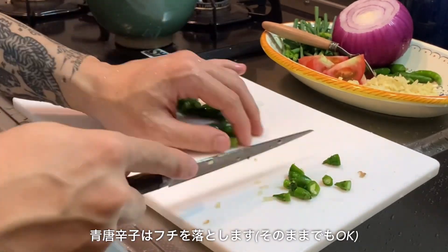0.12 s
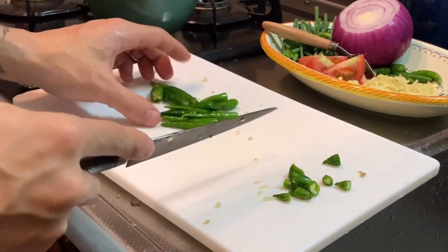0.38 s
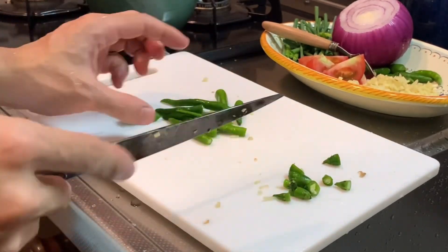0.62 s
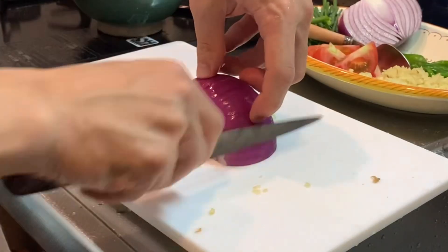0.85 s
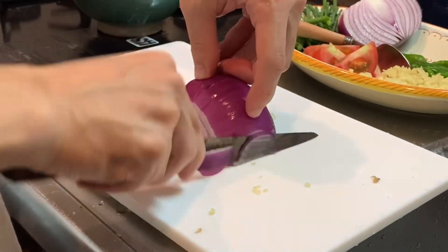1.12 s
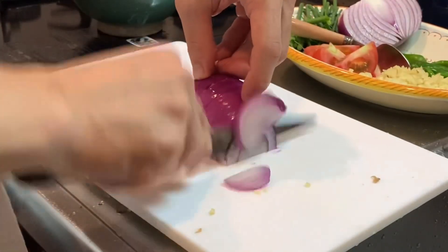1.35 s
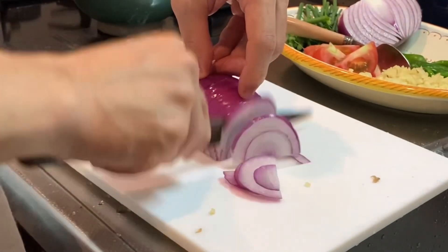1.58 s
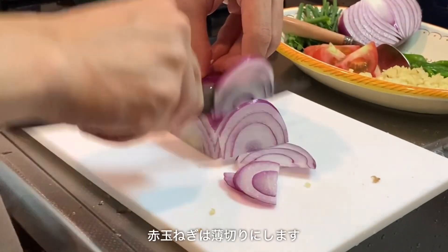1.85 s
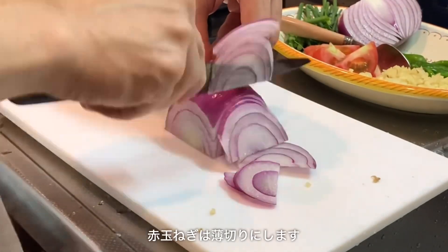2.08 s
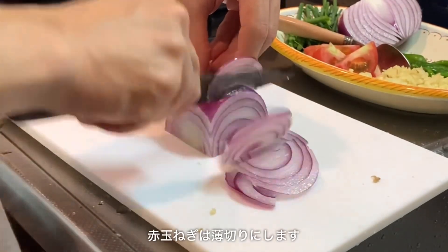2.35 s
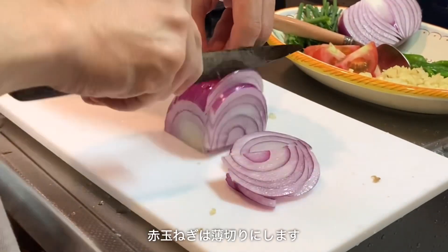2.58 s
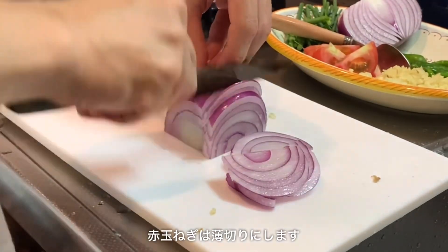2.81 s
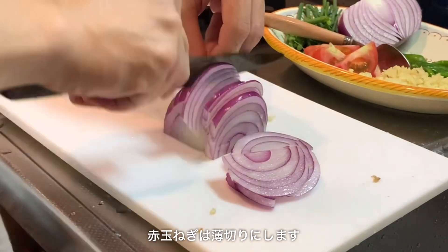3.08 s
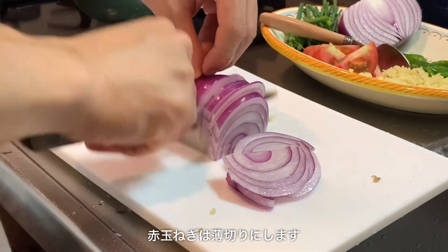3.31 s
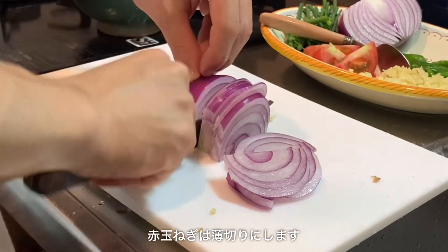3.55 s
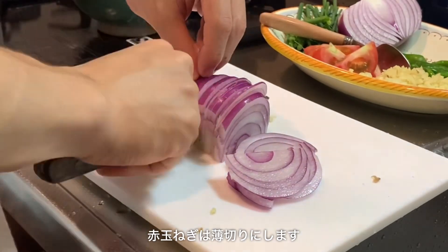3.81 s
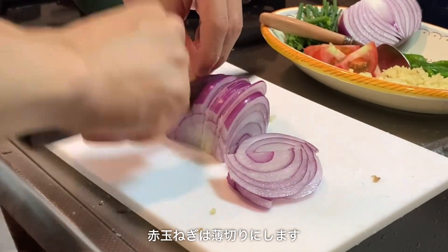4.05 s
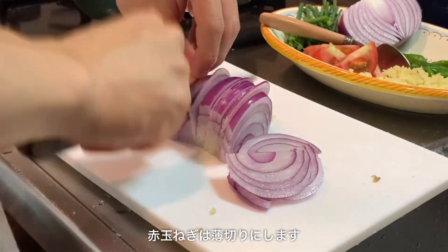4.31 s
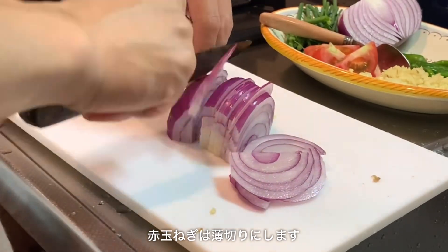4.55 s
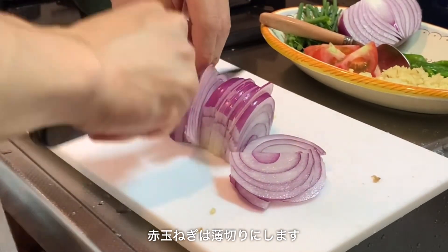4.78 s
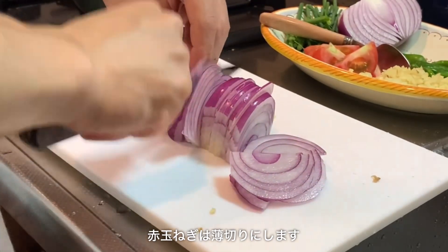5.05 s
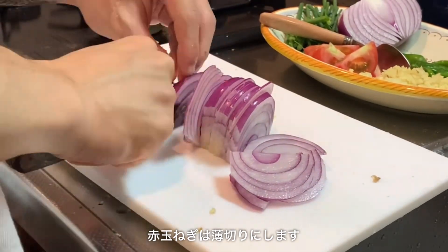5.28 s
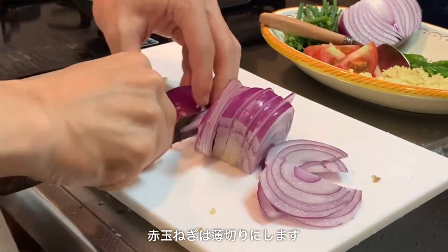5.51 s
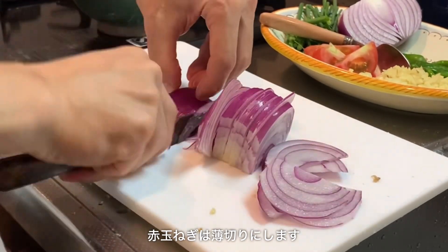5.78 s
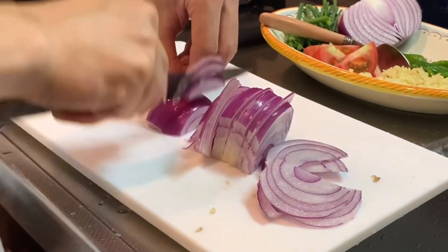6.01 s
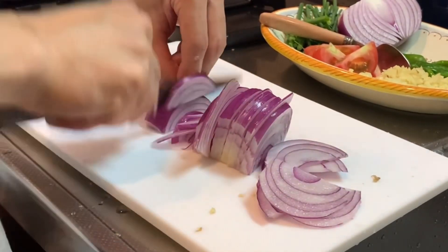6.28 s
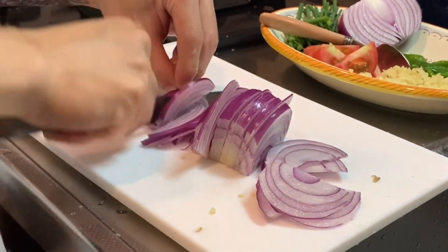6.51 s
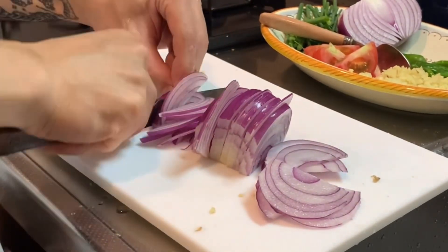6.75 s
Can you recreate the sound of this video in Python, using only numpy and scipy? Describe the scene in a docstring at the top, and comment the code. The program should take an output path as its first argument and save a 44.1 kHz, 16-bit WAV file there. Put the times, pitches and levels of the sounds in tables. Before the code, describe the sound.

A chef's knife slices an onion in rapid, crisp taps on a plastic cutting board, with wet crunches between, in a small kitchen with a fan behind.

```python
"""A chef's knife slices an onion on a plastic board in a small hard kitchen, close to a stereo microphone.
Each blow is a noise crack with a spike and a bounce, ringing board and blade modes, a room tail and a thud.
Grainy noise hisses through the wet flesh before each blow; fingers rustle in soft swells of dull noise.
Behind, a steady extractor fan of shaped noise and wavering sines is let through loud at first,
then held down by a noise suppressor, drawn as a level curve, that opens again during the later chopping."""
import sys
import numpy as np
from scipy import signal
from scipy.fft import rfft, irfft, next_fast_len
from scipy.io import wavfile
from scipy.ndimage import uniform_filter1d, map_coordinates

SR = 44100
rng = np.random.default_rng(int(sys.argv[2]) if len(sys.argv) > 2 else 0)


def decibels_to_gain(level_db):
    """Convert a level in decibels to a linear amplitude gain (20 dB per decade)."""
    exponent = np.asarray(level_db, float) / 20
    return 10 ** exponent


def log_audio(samples):
    """Write samples as a 16-bit WAV file to the path given in sys.argv[1]."""
    # one column per channel
    frames = np.atleast_2d(samples).T
    # limit to full scale, then quantise
    limited = np.clip(frames, -1, 1)
    pcm = np.round(limited * 32767).astype(np.int16)
    wavfile.write(sys.argv[1], SR, pcm)


N = 303408

# Blade on board: t/s, crack level/dB, then against the crack: knock level/dB, edge sparkle level/dB;
# last, time in the flesh before the blow/s
BLOWS = [(1.035, -32, -18, -58, 0.024), (1.1127, -27, -14.5, -29, 0.015), (1.2082, -28, -15.5, -35, 0.017),
         (1.2959, -18, -22.5, -19, 0.013), (1.3793, -20.5, -19.5, -24.5, 0.012),
         (1.4729, -17.5, -26, -19.5, 0.02), (1.573, -18.5, -24, -19.5, .023),
         (1.6741, -23, -23.5, -30, 0.027), (1.7836, -23, -21.5, -27, 0.031),
         (1.893, -17, -22, -14.5, 0.018), (2.0215, -22.5, -24.5, -18.5, 0.032),
         (2.1473, -25.5, -22, -29.5, 0.038), (2.2695, -20.5, -22, -12.5, 0.032),
         (2.5233, -23, -16, -17.5, 0.019), (2.6579, -26.5, -17, -20.5, 0.035),
         (2.7747, -20.5, -20, -17, .025), (2.9162, -32.5, -12.5, -19, 0.033),
         (3.0402, -25, -17.5, -19.5, 0.034), (3.1597, -24, -17, -22, 0.032),
         (3.3029, -33.5, -15, -21, 0.035), (3.4314, -30, -15, -19.5, 0.038),
         (3.5541, -22.5, -15, -18, 0.024), (3.8317, -35, -9.5, -27, 0.04),
         (3.959, -26.5, -16, -26.5, 0.037), (4.0886, -23, -20, -19.5, 0.032),
         (4.353, -24, -18.5, -21.5, 0.034), (4.4854, -18.5, -20.5, -21, 0.031),
         (4.7527, -26.5, -19, -23.5, 0.036), (4.8772, -22, -13.5, -21, 0.02), (5.014, -20, -17, -20, .023),
         (5.1396, -22, -18, -26.5, 0.0046), (5.6992, -28.5, -13.5, -23, 0.0025),
         (5.7971, -43, -8, -35, 0.0044), (5.879, -28, -14.5, -18, 0.0053), (5.972, -41, -7, -38, 0.012),
         (6.0606, -34, -11.5, -31, .0145), (6.1378, -30.5, -12, -20.5, 0.0067),
         (6.232, -27.5, -19, -27, 0.017), (6.3185, -36, -11, -45, 0.017), (6.406, -26.5, -17, -20, 0.0098),
         (6.505, -30, -15.5, -25, 0.015), (6.5949, -33, -13, -20.5, .014),
         (6.724, -28.5, -14.5, -21, 0.013)]
# Light touches of blade or food on the board: t/s, crack level/dB, then against the crack:
# knock level/dB, mid ring level/dB, sparkle level/dB
LIGHT_TOUCHES = [(0.381, -64, 2, -1, -18), (0.4538, -62.5, 10, 6, -10), (0.7887, -60.5, 9, 2, -1),
                 (4.5874, -52, 6.5, 1.5, -1), (5.2749, -62, 14.5, -4, -18), (5.389, -64.5, 0, 12.5, -38),
                 (5.5738, -49.5, -5, 3, -29)]
TOUCH_THUD_DB = -71.5
USUAL_CRACK_DB, USUAL_PACE = -25, 8  # pace in strokes a second
RING_DB, RING_GROWTH = -7.5, 0.54  # against a usual crack; dB of ring per dB of crack
THUD_DB, THUD_GROWTH, THUD_PER_PACE = -60.5, 0.34, 2  # relative dB; dB per dB of crack; dB per extra stroke/s


def place_on_board(s):
    """The blade works steadily across the board, from -1 at the start to 1 at the end."""
    return 2 * s * SR / N - 1


def blows():
    """Rows (s, crack, thud, knock, ring, sparkle dB, cut s): ring lags the crack, fast chopping thuds more."""
    s, crack_db, knock_db, sparkle_db, cut_s = np.transpose(BLOWS)
    gaps = np.diff(s, prepend=s[0] - 1 / USUAL_PACE)
    pace = uniform_filter1d(1 / gaps, size=5)  # over a few strokes
    firmness_db = crack_db - USUAL_CRACK_DB
    ring_db = RING_DB + (RING_GROWTH - 1) * firmness_db
    hurry = np.maximum(pace - USUAL_PACE, 0)
    thud_db = THUD_DB + THUD_GROWTH * firmness_db + THUD_PER_PACE * hurry - crack_db
    soft = [(at, level, TOUCH_THUD_DB - level, *rest, 0) for at, level, *rest in LIGHT_TOUCHES]
    return list(zip(s, crack_db, thud_db, knock_db, ring_db, sparkle_db, cut_s)) + soft


def edge_crack(t):
    """The edge lands as a noise burst with one sharp spike, then bounces a few milliseconds later."""
    crack = decibels_to_gain(-60 * t / .005) * (1 - np.exp(-t / .0002)) * rng.standard_normal((1, len(t)))
    crack[0, 6] += 2.5  # spike 6 samples after first contact
    bounce = decibels_to_gain(rng.uniform(-11.5, -2.0)) * np.roll(crack, round(rng.uniform(0.0017, 0.0038) * SR))
    return crack, bounce


USUAL_CUT_S = 0.032


def run_up(t, lead, cut_s):
    """Short noise that grows up to the blow, fainter after a very short cut."""
    strength = min(cut_s / USUAL_CUT_S + 0.31, 1)
    return strength * decibels_to_gain(-8.5 - 60 * t[lead::-1] / 0.023) * rng.standard_normal((2, lead + 1))


# Heavy counter, spectrum: f/Hz, relative level/dB per Hz
COUNTER_TONE = [(35, -53), (60, -6), (95, 2), (140, -1), (200, 2), (300, 3), (420, -30.5)]
COUNTER_HZ = 93.1  # centre; each blow strays from it


def counter_thud(t):
    """The heavy counter answers late and soft, as rumble and one low sine, fullest after 21 ms."""
    swell = t / 0.014 * np.exp(1 - t / 0.021)
    rumble = swell * unit(coloured(rng.standard_normal((2, len(t))), COUNTER_TONE))
    hz = COUNTER_HZ * decibels_to_gain(rng.normal(0, 1.0))
    return rumble, swell * np.sin(2 * np.pi * hz * t)[None]


# Board modes: f/Hz, level/dB, t60/s, drift/dB from mid board to the end of the work
BOARD_MODES = [(463.7, -13.5, 0.1615, 6), (503, -13, 0.14, 6), (673.8, -18.5, 0.16, -7.5),
               (946, -22.5, 0.11, 3.5), (1118, -24, 0.13, 9), (1559, -28, 0.21, 7), (1612, -14, 0.1, 5),
               (1735, -22, 0.11, 2), (1867, -22.5, 0.15, -2), (1920, -30, 0.12, 8), (1975, -19, 0.174, 6),
               (2040, -21.5, 0.13, 6), (2304, -29, 0.086, -8.5), (2190, -25, 0.12, 0),
               (2540, -44, 0.13, 5.5), (3380, -27, 0.024, -3), (3420, -30.5, 0.07, -11),
               (4020, -29.5, 0.12, 5), (4400, -33.5, 0.077, 10), (4360, -23.5, 0.12, 1.5),
               (4960, -29.5, 0.18, 1), (4750, -29, 0.17, -0.5), (5100, -29, 0.11, 6), (5280, -29, 0.14, 9),
               (5550, -29.5, .14, -1.5), (5830, -26.5, 0.11, 1.5), (6060, -23, 0.058, -10),
               (6950, -40, 0.066, 14)]
# Steel damped by hand and flesh, modes: f/Hz, level/dB, t60/s, drift/dB from mid board to the end of the work
BLADE_MODES = [(1263, -18, 0.032, -18.5), (1676, -15.5, 0.036, 0.5), (1854, -12.5, 0.049, 11),
               (2018, -14, 0.053, -1), (2380, -11.5, 0.029, -8), (2652, -11, 0.019, 1.5),
               (3310, -11.5, 0.023, 0), (4130, -11, 0.019, 5.5), (4608, -17, 0.037, -8.5),
               (4810, -18, 0.027, -12), (5050, -14.5, 0.02, 8.5), (5537, -6, 0.012, -3),
               (6720, -34, 0.017, 2), (6820, -21, 0.043, 7), (7340, -14, 0.017, -16.5),
               (8020, -19.5, 0.021, -22.5)]
# Where knock, ring, crack and sparkle sit: f/Hz
PART_HZ = [500, 2000, 5000, 11000]
# Crack and tail, spectrum: f/Hz, level/dB
CRACK_TONE = [(250, -48.5), (400, -32), (480, 12), (750, 2), (1200, 9.5), (2000, 8), (2900, -1), (3700, -2),
              (4900, 0), (6200, 4), (7300, -2.5), (9500, 8.5), (14500, 2.5), (16500, -22)]
# Crack and tail, change of tone: f/Hz, drift/dB from mid board to the end of the work
CRACK_DRIFT = [(500, 4), (1200, -1), (1900, 7.5), (2500, 1.5), (6000, 2.5), (7800, -1), (10000, 7)]
# What the walls give back of the treble: f/Hz, level/dB
WALL_TONE = [(5000, 0), (7500, -1.5), (11000, -6), (14500, -15), (15500, -21)]


def taps():
    """Each blow cracks and bounces, rings board and blade, fills the room and thuds into the counter."""
    near, far = np.zeros((1, N)), np.zeros((2, N))
    lead, count = SR // 100, SR * 2 // 5  # samples before and after contact
    t = np.arange(count) / SR
    mode_hz, mode_db, t60, drift_db = np.transpose(BOARD_MODES + BLADE_MODES)
    rise = 30 * t60 / mode_hz  # low, long modes build up late
    modes = np.exp(2j * np.pi * np.outer(mode_hz, t))
    modes = modes * decibels_to_gain(-60 * t / t60[:, None]) * (1 - np.exp(-t / rise[:, None]))

    for s, db, thud_db, knock_db, ring_db, sparkle_db, cut_s in blows():
        place = place_on_board(s)
        start = s - lead / SR
        colour = list(zip(PART_HZ, [knock_db, ring_db, 0, sparkle_db]))

        def shape(x):
            """Colour a sound as this blow, with room ahead for the filter's pre-ringing."""
            padded = np.pad(x, ((0, 0), (lead, 0)))
            return filtered(padded, lambda hz: decibels_to_gain(db + along(CRACK_TONE, hz)
                                                   + place * along(CRACK_DRIFT, hz) + along(colour, hz)))

        crack, bounce = edge_crack(t)
        add(near, shape(decibels_to_gain(3) * (crack + bounce)), start)
        add(far, shape(run_up(t, lead, cut_s))[:, lead:], start)
        bare_edge = filtered(crack, lambda hz: (hz > 8500) * (hz < 16700))  # gone at once
        add(near, decibels_to_gain(db + sparkle_db + 1.5) * bare_edge, s)

        scatter_db = rng.normal(0, 2.97, len(t60))
        strength = decibels_to_gain(db + mode_db + place * drift_db + along(colour, mode_hz) + scatter_db)
        phase = rng.normal(0, 40 * t60)  # short modes start in step with the blow, long ones do not
        add(near, decibels_to_gain(5.5) * (strength * np.exp(1j * phase) @ modes).imag[None], s)

        tail = reverberation(count, late_db=-19.5, late_slower=2.58, patchy_db=3.5)
        tail = (1 - np.exp(-t / 0.0017)) * tail
        add(far, shape(decibels_to_gain(-6) * coloured(tail, WALL_TONE)), start)

        rumble, hum = counter_thud(t)
        add(far, decibels_to_gain(db + thud_db - 3.5) * rumble, s)
        add(near, decibels_to_gain(db + thud_db - 8.0) * hum, s)
    return direct(near) + diffuse(far)


# Strokes and scrapes that never reach the board: t/s, length/s, relative hiss level/dB
FREE_STROKES = [(0.918, 0.025, -75), (2.362, 0.063, -64), (3.658, 0.049, -58.5), (4.189, 0.042, -58.5),
                (4.588, 0.042, -60), (5.335, 0.074, -72), (5.438, 0.036, -77)]
# Wet flesh, spectrum: f/Hz, relative level/dB per Hz
FLESH_TONE = [(290, -12.5), (500, -0.5), (1020, -11), (1950, -0.5), (2650, -1.5), (6010, -4), (10200, -10),
              (13200, -7.5), (15800, -12.5), (16500, -44)]
SINK_DB_PER_S, SCRAPE_DB_PER_S = 59.5, -60  # hiss grows towards a blow, fades in a free stroke
CUT_DB, CUT_DB_PER_S = -58.5, -190  # relative hiss level of a usual cut; quicker cuts hiss louder


def cuts():
    """Cells burst in a dense hiss that grows as the blade sinks; the room carries it on."""
    t, level_db = np.arange(N) / SR, np.full(N, -130.)
    strokes = [(*row, SCRAPE_DB_PER_S) for row in FREE_STROKES]
    for s, *_, length in BLOWS:
        strokes.append((s - length, length, CUT_DB + CUT_DB_PER_S * (length - USUAL_CUT_S), SINK_DB_PER_S))
    for s, length, db, slope in strokes:
        u = t - s
        fade_in_db = 3500 * np.maximum(.003 - u, 0)
        fade_out_db = 900 * np.maximum(u - length, 0)
        stroke_db = db + slope * (u - length / 2) - fade_in_db - fade_out_db
        level_db = np.maximum(level_db, stroke_db)
    grain = decibels_to_gain(3.7 * wobble(700) + 3.9 * wobble(90) + 1.97 * wobble(30))
    pops = 3.4 * (rng.random(N) < .02) * np.minimum(rng.exponential(size=N), 2)  # single cells pop louder
    hiss = coloured((grain + pops) * rng.standard_normal((2, N)), FLESH_TONE)
    close = decibels_to_gain(level_db + 4.0) * unit(hiss)
    tail = reverberation(SR // 2, late_db=-33.0, late_slower=1.8, patchy_db=4.0)
    tail = tail / np.linalg.norm(tail[0])
    return close + decibels_to_gain(-1.0) * signal.fftconvolve(close, tail, axes=1)[:, :N]


# Fingers push food over the board, soft swells: centre t/s, half width/s, level/dB
FINGER_SWELLS = [(.15, 0.054, -66.5), (.48, 0.037, -67.5), (.815, 0.021, -67.5), (5.41, .035, -73)]
# Scraping, spectrum: f/Hz, relative level/dB per Hz
FINGER_TONE = [(500, -4), (1200, 2), (3000, 0), (4800, -5), (6500, -17), (12000, -27)]


def rustles():
    """Fingers scrape food along in uneven, dull noise that swells and fades."""
    t = np.arange(N) / SR
    swells = sum(decibels_to_gain(db) * np.exp(-((t - s) / width) ** 2) for s, width, db in FINGER_SWELLS)
    grains = decibels_to_gain(1.9 * wobble(250) + 1.8 * wobble(45)) * rng.standard_normal((2, N))
    return swells * unit(coloured(grains, FINGER_TONE))


# Level of fan let through, before a random flutter: t/s, level/dB
FAN_LET_THROUGH = [(0, -54.5), (.3, -59), (.77, -58.5), (.83, -70), (1.4, -71), (1.9, -68), (5.05, -67.5),
                   (5.2, -72.5), (5.7, -71), (6, -61.5), (6.4, -63), (6.88, -72.5)]
# Air rush, spectrum: f/Hz, relative level/dB per Hz
AIR_TONE = [(25, -62.5), (50, -33), (90, -5.5), (160, -10), (300, -9), (430, -13.5), (540, -14), (700, -20),
            (1200, -21), (1700, -27.5), (2200, -36), (7000, -44.5), (10000, -45.5), (14300, -47),
            (15500, -70)]
# Motor and duct lines: f/Hz, pitch wander/Hz, relative level/dB
HUM_LINES = [(200.6, 1.3, -5.5), (271.7, .8, -1.9), (363, 3.5, -12), (547, 5.7, -14), (918, 28, -16),
             (1082, 9.2, -15.5), (1620, 28, -40.5), (4730, 99, -26.5), (8550, 180, -27.5)]


def fan():
    """Steady air rush as shaped noise, with wavering hum lines from motor and duct, let through by a level curve."""
    s, db = np.transpose(FAN_LET_THROUGH)
    air = unit(coloured(rng.standard_normal((2, N)), AIR_TONE))
    hum = np.zeros(N)
    for hz, wander, line_db in HUM_LINES:
        pitch = hz + wander * wobble(6 * wander)
        hum += decibels_to_gain(line_db + 1.34 * wobble(12)) * np.sin(2 * np.pi * np.cumsum(pitch) / SR)
    let_through = decibels_to_gain(np.interp(np.arange(N) / SR, s, db) + 2.3 * wobble(6.5))
    left, right = let_through * (decibels_to_gain(-3.0) * diffuse(air) + hum)
    return np.array([left, np.roll(right, 9)])  # the right port hears it 9 samples later


# Kitchen decay, main part: f/Hz, t60/s
ROOM_DECAY = [(100, 0.32), (500, 0.27), (1200, 0.12), (2000, 0.17), (5000, 0.16), (8000, 0.14),
              (13500, 0.12), (16000, 0.077)]


def reverberation(count, late_db, late_slower, patchy_db):
    """A fresh noise tail: each frequency dies at its own speed, a weaker part lingers, echoes come in patches."""
    hz, t, z = signal.stft(rng.standard_normal((2, count)), SR, nperseg=128)
    patches = uniform_filter1d(rng.standard_normal(z.shape[1:]), size=2, axis=0)
    patches = unit(uniform_filter1d(patches, size=8, axis=1))
    fall_db = -60 * t / along(ROOM_DECAY, hz)[:, None]
    gain = decibels_to_gain(patchy_db * patches) * (decibels_to_gain(fall_db) + decibels_to_gain(late_db + fall_db / late_slower))
    return signal.istft(z * gain, SR, nperseg=128)[1][:, :count]


# Left-right likeness of spread sound: f/Hz, correlation (1 = same)
LIKENESS = [(60, 1), (200, 0.91), (550, 0.75), (1650, 0.04), (5000, 0.021), (15000, 0)]


def diffuse(pair):
    """Two unrelated signals become left and right: alike in the bass, unrelated in the treble."""
    def mid_side(hz):
        turn = np.arccos(np.clip(along(LIKENESS, hz), -1, 1)) / 2
        return np.array([np.cos(turn), np.sin(turn)])
    mid, side = filtered(pair, mid_side)
    return np.array([mid + side, mid - side])


# Direct sound, phase by which left leads right: f/Hz, lead/rad
LEFT_LEAD = [(60, -1), (500, 0.7), (1000, 1.32), (2000, 1.34), (4000, 1.37), (8000, 2.5), (16000, 1.1)]


def direct(x):
    """One sound reaches the two ports with a phase gap that depends on frequency."""
    return filtered(x, lambda hz: np.exp(1j * np.outer([.5, -.5], along(LEFT_LEAD, hz))))


def balanced(pair, balance):
    """Tilt left against right by frequency."""
    return filtered(pair, lambda hz: decibels_to_gain(np.outer([.5, -.5], along(balance, hz))))


def wobble(rate):
    """A smooth random curve, rate knots a second."""
    return map_coordinates(rng.standard_normal(int(N * rate / SR) + 4), [np.arange(N) * rate / SR])


def unit(x):
    """Scaled to rms 1."""
    return x / np.sqrt(np.mean(x ** 2) + 1e-20)


def along(points, hz):
    """(Hz, value) points read on a log frequency axis."""
    f, v = np.transpose(points)
    return np.interp(np.log(hz + 1), np.log(f + 1), v)


def filtered(x, response):
    """Spectrum of x times a response of frequency."""
    n = x.shape[-1]
    m = next_fast_len(n + 8192)
    return irfft(rfft(x, m) * response(np.fft.rfftfreq(m, 1 / SR)), m)[..., :n]


def coloured(x, tone):
    """x equalised by a table of (Hz, dB) points."""
    return filtered(x, lambda hz: decibels_to_gain(along(tone, hz)))


def add(track, sound, s):
    """Mix a sound into the track at s seconds."""
    part = track[:, max(round(s * SR), 0):][:, :sound.shape[1]]
    part += sound[:, :part.shape[1]]


# Knife and food, left over right: f/Hz, level/dB
KNIFE_BALANCE = [(60, -3.5), (180, -6), (550, 1), (1650, 1), (4970, 0), (15000, -2.5)]
# Fan, left over right: f/Hz, level/dB
FAN_TILT = [(60, -4), (240, -5), (950, 0.5), (3770, -1), (15000, -0.5)]


def scene():
    """Knife and food close by, the fan behind with its bass leaning right."""
    knife = taps() + diffuse(cuts() + rustles())
    return balanced(knife, KNIFE_BALANCE) + balanced(fan(), FAN_TILT)


def low_pass(x):
    """Removes everything above the highest recorded frequency."""
    return signal.sosfilt(signal.butter(12, 16820, fs=SR, output="sos"), x)


def record(dry):
    """The microphone drops the deepest bass, with a second-order low cut at 40 Hz."""
    mix = filtered(dry, lambda hz: (1j * hz / (40 + 1j * hz)) ** 2)
    return low_pass(mix)


dry = scene()
out = record(dry)
log_audio(out)
```